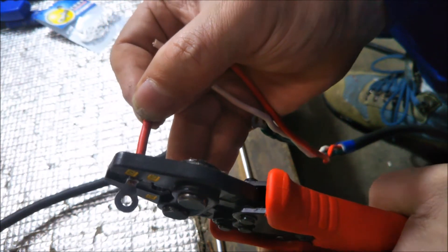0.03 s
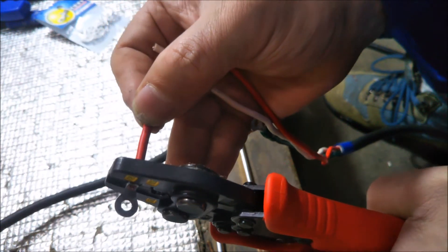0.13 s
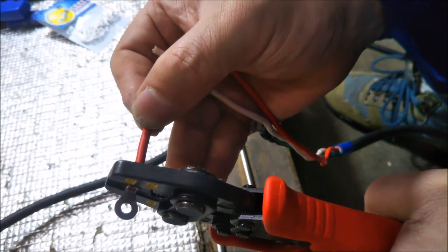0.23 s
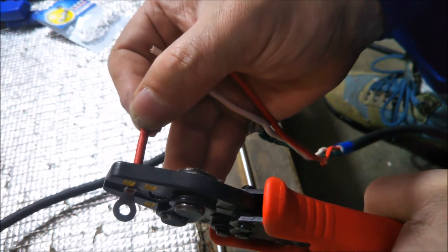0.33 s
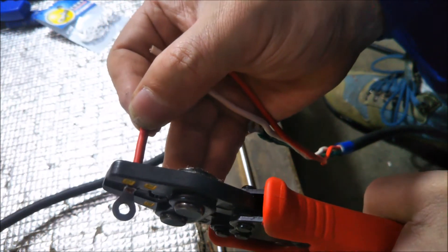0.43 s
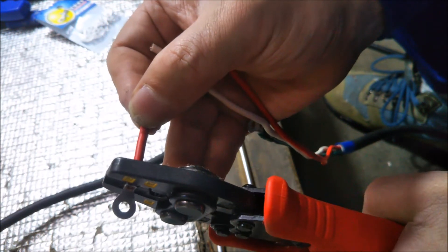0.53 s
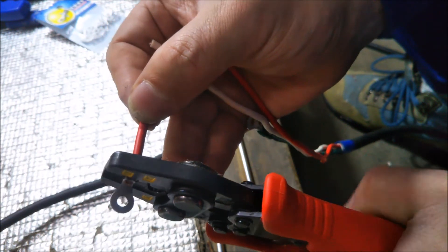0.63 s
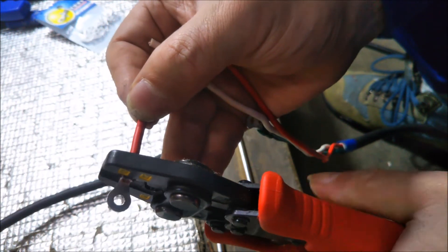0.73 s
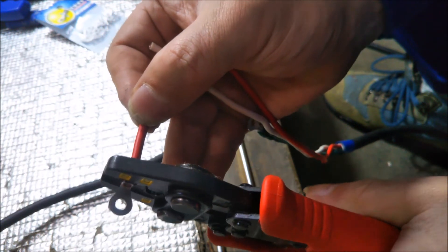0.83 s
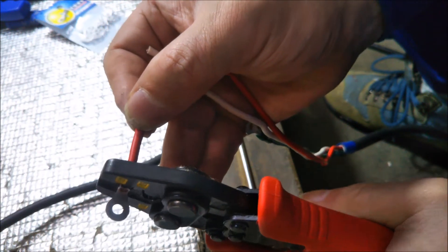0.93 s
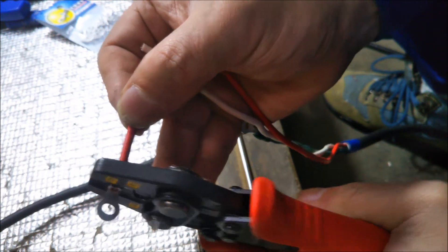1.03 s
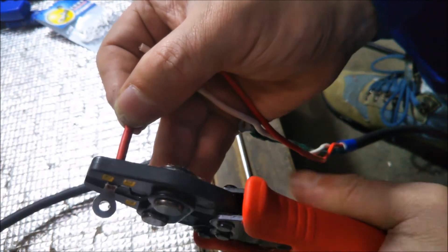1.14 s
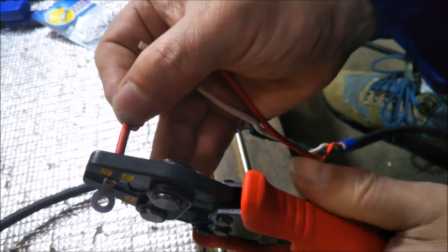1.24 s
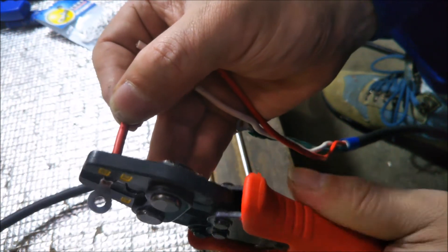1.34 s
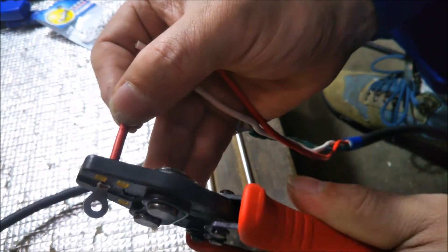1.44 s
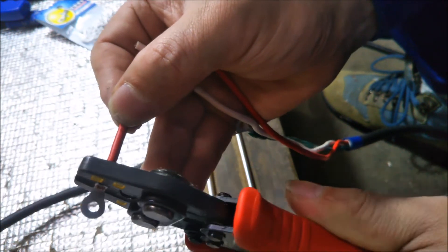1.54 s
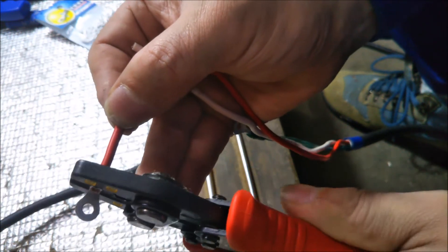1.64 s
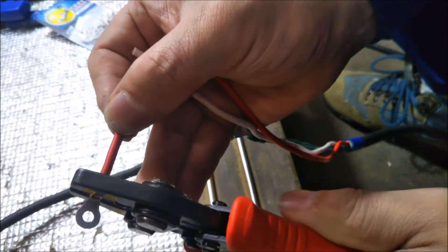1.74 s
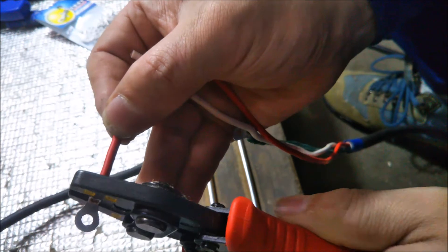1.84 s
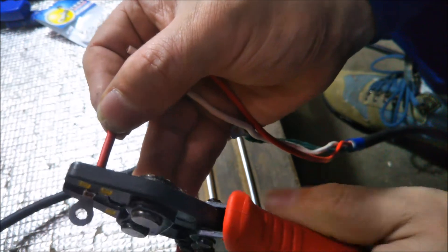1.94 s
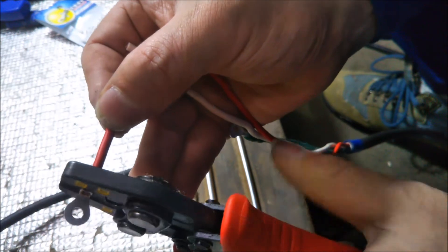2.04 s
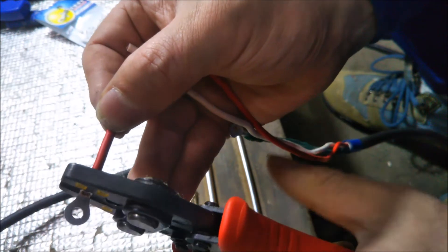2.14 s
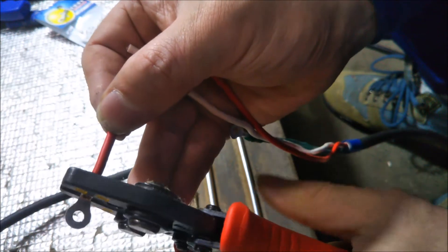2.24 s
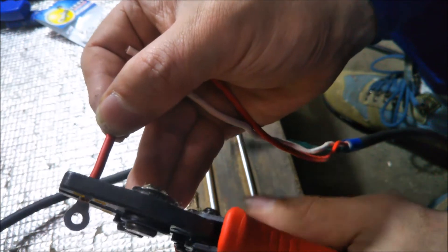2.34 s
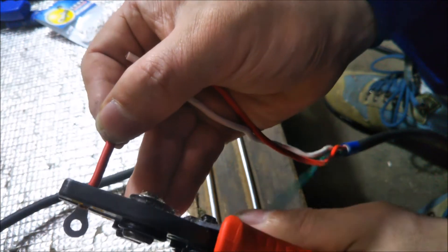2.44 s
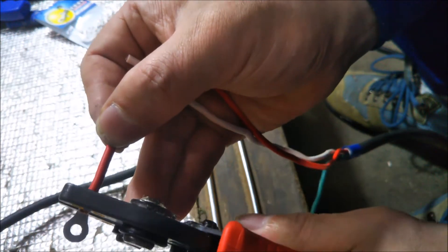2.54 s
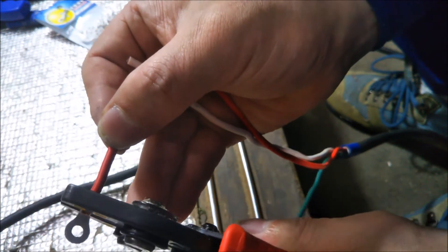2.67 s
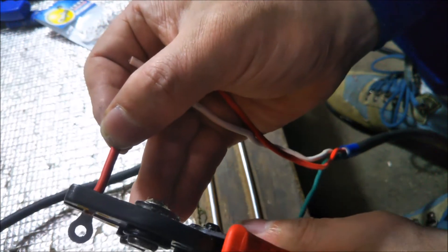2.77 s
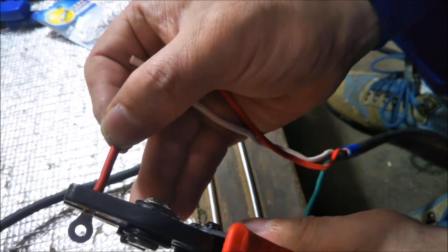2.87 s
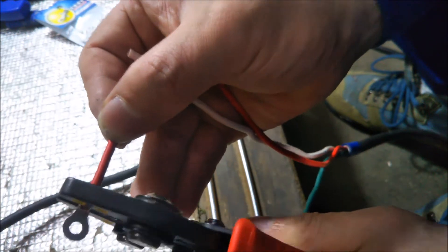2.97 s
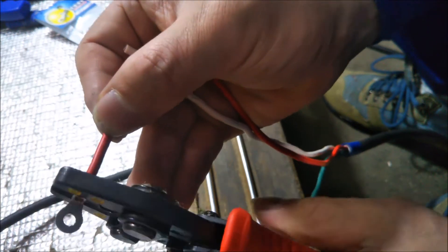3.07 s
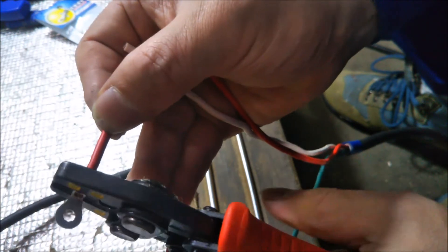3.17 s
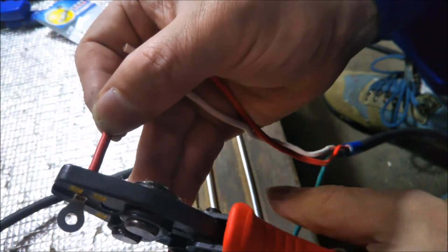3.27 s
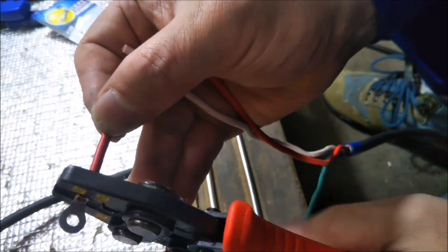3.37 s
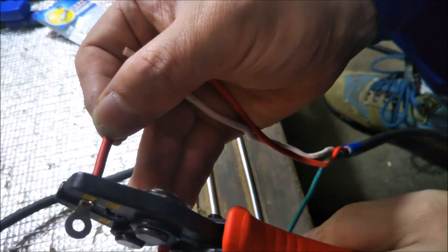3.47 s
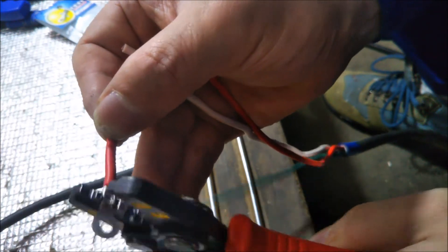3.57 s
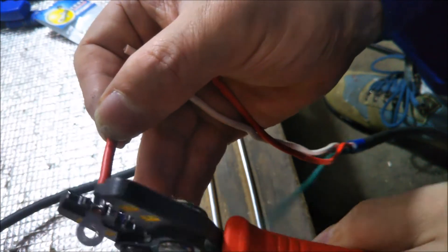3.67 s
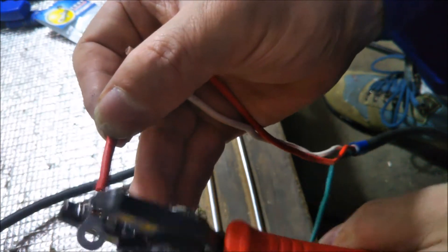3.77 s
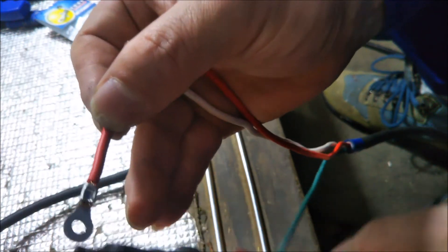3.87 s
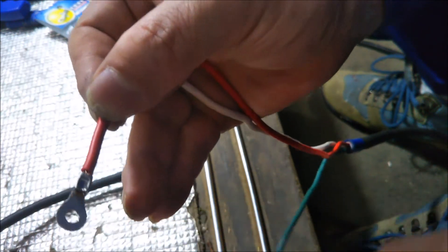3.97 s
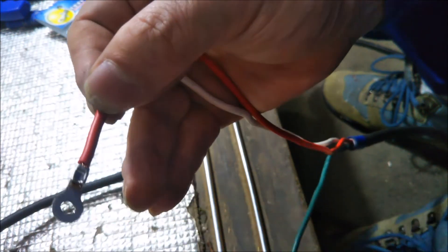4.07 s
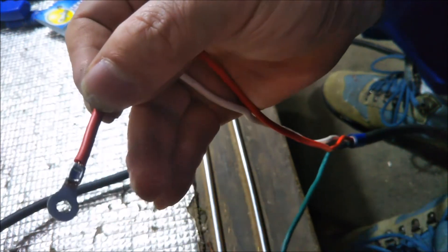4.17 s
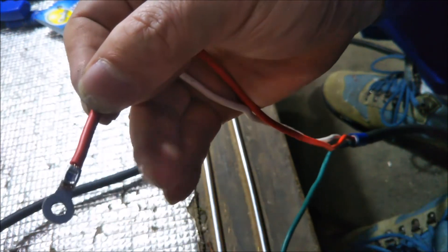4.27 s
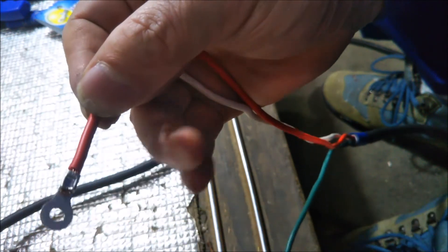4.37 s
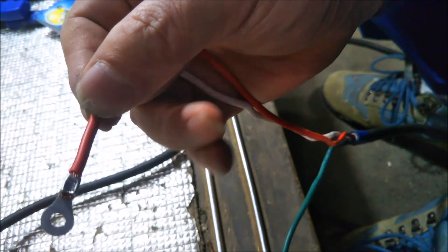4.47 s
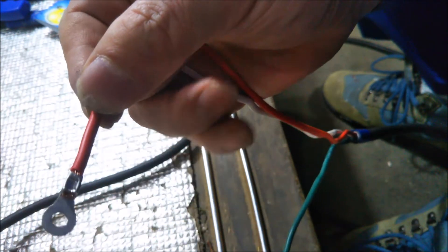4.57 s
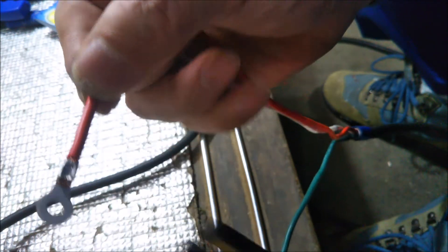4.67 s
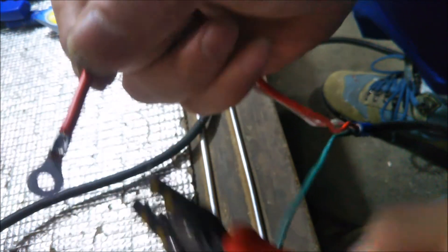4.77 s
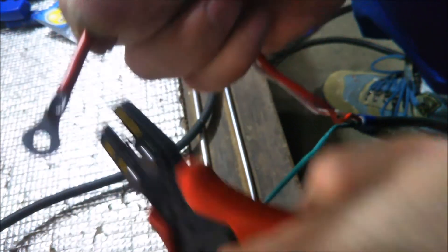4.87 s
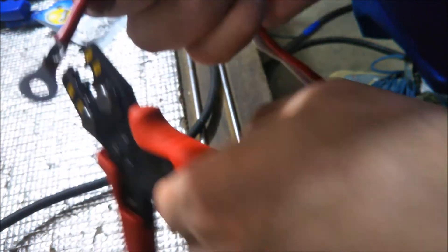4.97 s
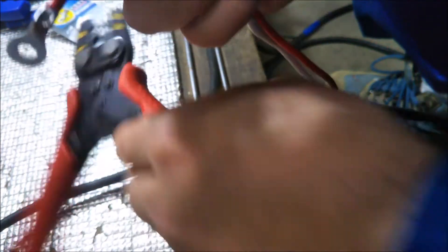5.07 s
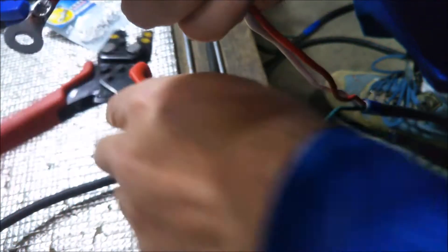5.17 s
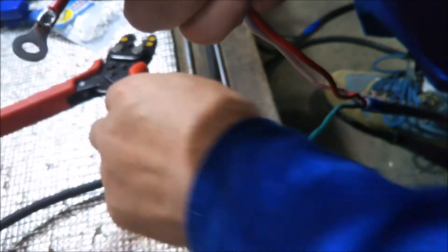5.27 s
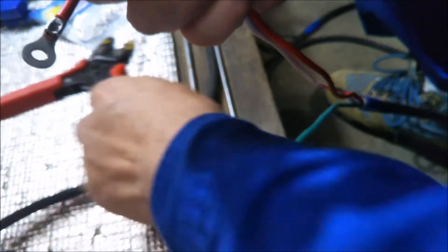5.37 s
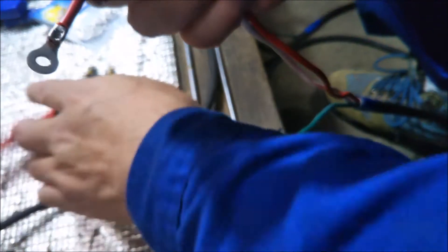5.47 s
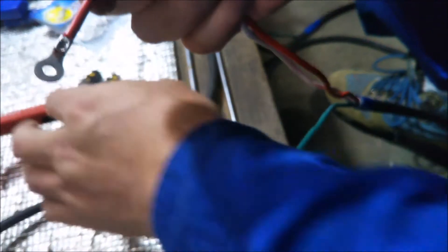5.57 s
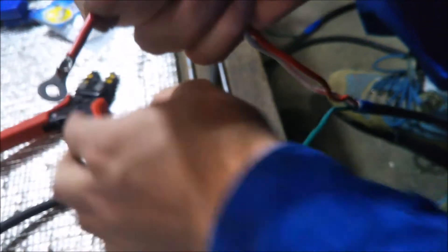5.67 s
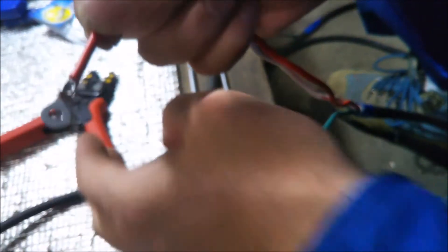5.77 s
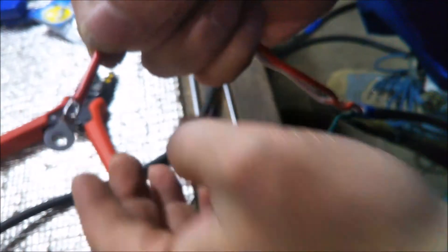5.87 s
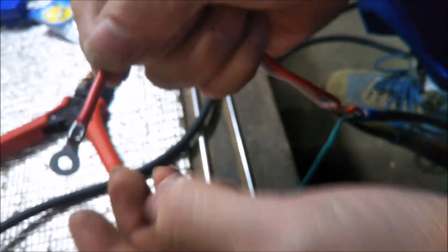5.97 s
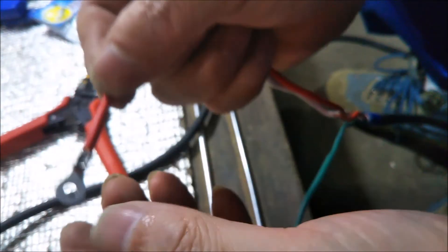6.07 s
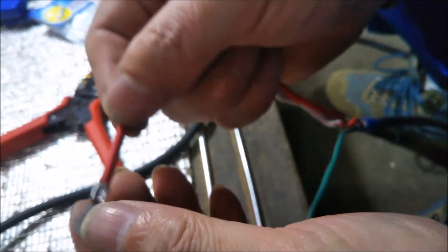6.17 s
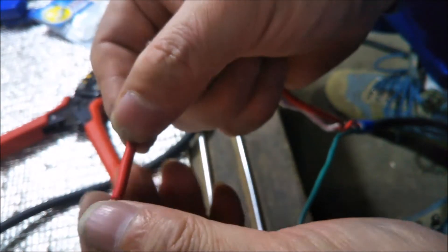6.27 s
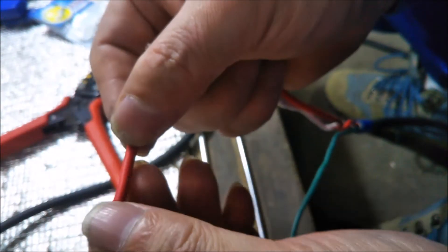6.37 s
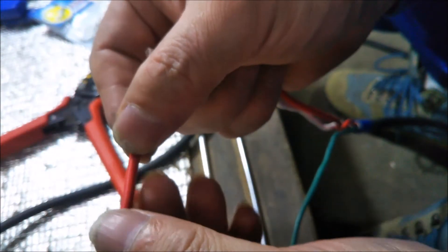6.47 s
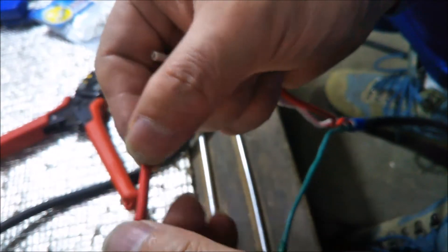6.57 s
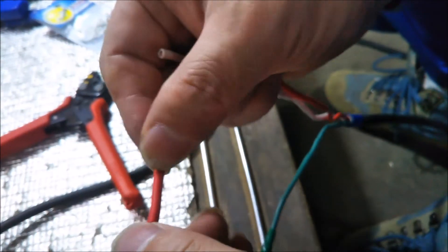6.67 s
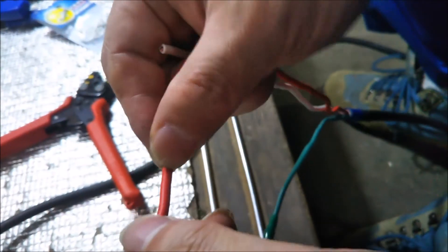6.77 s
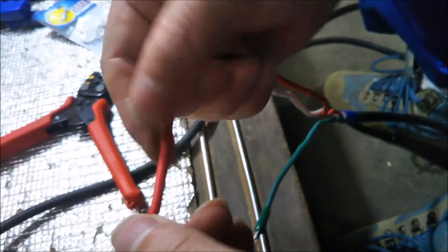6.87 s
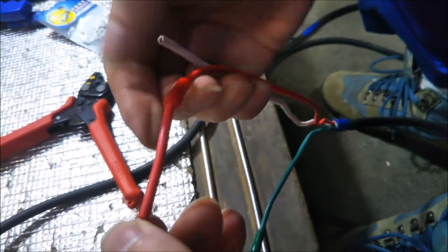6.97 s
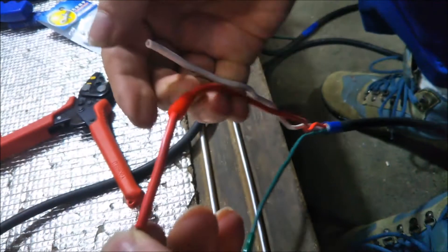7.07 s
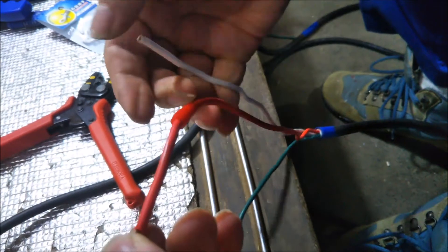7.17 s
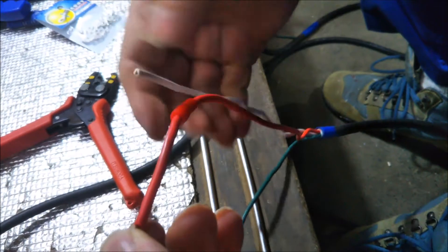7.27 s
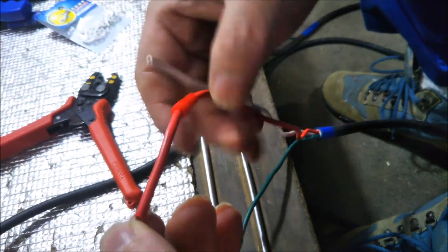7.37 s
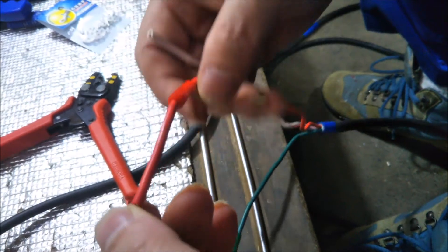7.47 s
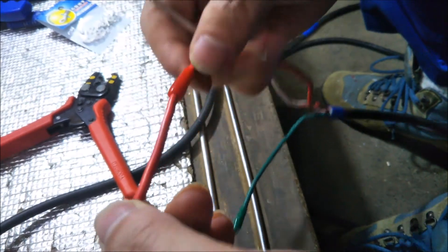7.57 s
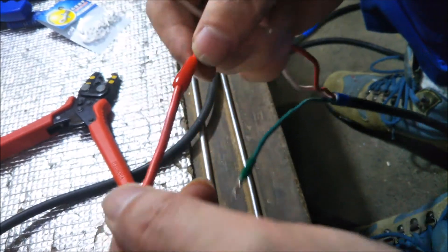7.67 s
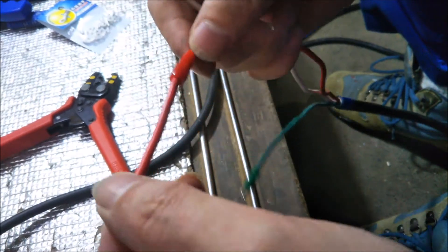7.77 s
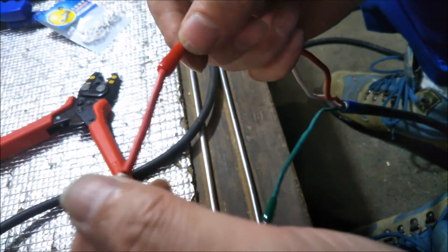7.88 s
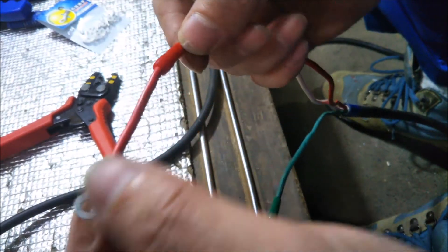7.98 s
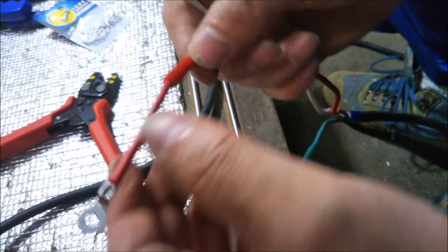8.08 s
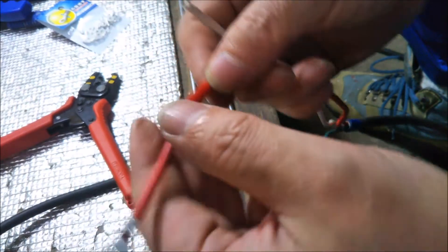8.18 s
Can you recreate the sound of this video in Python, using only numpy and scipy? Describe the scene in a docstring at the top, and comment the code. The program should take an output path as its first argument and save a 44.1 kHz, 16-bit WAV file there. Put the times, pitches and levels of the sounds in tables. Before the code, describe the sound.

A hand crimper ticks tooth by tooth, zips open, snaps hollowly twice, and is dropped with a knock and short slide amid quiet cloth rustles.

```python
"""A ratcheting crimper closes on a wire terminal: its steel pawl drops tooth by tooth, and the jaws ring faintly.
The pawl slips over a few teeth, then a spring runs it back over the rack, faster and faster, as the handles open.
The tool gives two dull snaps, is set down on a workbench with a clatter and a thump, and slides a little.
From shortly before the handles open to the end, a sleeve and fingers rustle faintly now and then.
Steady workshop air and a thin hiss, both made of coloured noise, lie under everything."""
import sys
import numpy as np
from scipy import signal
from scipy.fft import rfft, irfft, next_fast_len
from scipy.io import wavfile
from scipy.ndimage import uniform_filter1d, map_coordinates

SR = 44100
rng = np.random.default_rng(int(sys.argv[2]) if len(sys.argv) > 2 else 0)


def pcm_store(signal):
    """Save signal as 16-bit PCM."""
    levels = np.round(np.clip(np.atleast_2d(signal), -1, 1) * 32767)
    wavfile.write(sys.argv[1], SR, levels.astype(np.int16).T)


N = 362046  # length of the scene in samples

# In the tables, a fade time is the time a sound takes to drop by 60 dB.
# Bright colour of small hard contacts and of sliding. Each row: frequency in Hz, relative level in dB.
TICK_COLOUR = [(300, -8), (3000, -2), (4300, -3.5), (6000, -20.5), (8000, -4.5), (11000, -6), (14000, 1.5),
               (14600, -44), (16000, -30)]
TOOTH_TICK_FADE_S = 0.0062  # fade time of the tick of one tooth
SCATTER_DB = 1.5  # every mode is struck a little differently from blow to blow


def amp(db):
    """Turn decibels into a gain."""
    return 10 ** (np.asarray(db) / 20)


def unit(x):
    """Scale a sound to an rms (average strength) of 1."""
    return x / np.sqrt(np.mean(x ** 2) + 1e-20)


def along(points, hz):
    """Read values between (Hz, value) points on a logarithmic pitch axis."""
    f, v = np.transpose(points)
    return np.interp(np.log(hz + 1), np.log(f + 1), v)


def filtered(x, gain):
    """Multiply the spectrum of x by a gain that depends on frequency."""
    size = next_fast_len(N + SR // 2)
    spectrum = rfft(x, size) * gain(np.fft.rfftfreq(size, 1 / SR))
    return irfft(spectrum, size)[:N]


def noise(colour):
    """Shape random noise to a colour, at rms 1."""
    return unit(filtered(rng.standard_normal(N), lambda hz: amp(along(colour, hz))))


def add(track, s, sound):
    """Mix a sound into the track at s seconds; whatever falls outside the track is cut off."""
    start = round(s * SR)
    part = sound[max(-start, 0):N - start]
    track[max(start, 0):][:len(part)] += part


def burst(colour, t60, rise=0.00033, size=8192):
    """A contact: dying noise takes on the colour of the struck body, with the energy of 1 ms at rms 1."""
    t = np.arange(size) / SR
    fade = amp(-60 * t / t60)
    blow = rfft(rng.standard_normal(size) * fade * (1 - np.exp(-t / rise)))
    # divide out the blow's own smoothed colour, so that the struck body sets it
    ripple = np.sqrt(np.abs(uniform_filter1d(np.abs(blow) ** 2, size=130))) + 1e-9
    wanted = amp(along(colour, np.fft.rfftfreq(size, 1 / SR)))
    # folding the cepstrum gives a filter that only answers after the blow, never before
    cepstrum = irfft(np.log(wanted / ripple))
    body = np.exp(rfft(2 * cepstrum[:size // 2], size))
    hit = irfft(blow * body)
    return hit / np.linalg.norm(hit) * np.sqrt(SR / 1000)


def in_room(hit, wet_db, near_db, near_t60):
    """A hit with dense echoes from things nearby and the longer tail of the workshop."""
    # How long the workshop echoes. Each row: frequency in Hz, fade time in seconds.
    room_fade = [(100, 0.37), (500, 0.2), (1500, 0.3), (4000, 0.34), (8000, 0.27), (14100, 0.2),
                 (14600, 0.062)]
    hz, t, z = signal.stft(rng.standard_normal(SR // 2), SR, nperseg=256)
    fade = amp(-60 * t / along(room_fade, hz)[:, None])
    tail = signal.istft(z * fade, SR, nperseg=256)[1]
    t = np.arange(len(tail)) / SR
    tail = tail * (1 - np.exp(-t / 0.0014))
    near = rng.standard_normal(len(t)) * amp(-60 * t / near_t60) * (1 - np.exp(-t / .001))
    echoes = amp(wet_db) * tail / np.linalg.norm(tail) + amp(near_db) * near / np.linalg.norm(near)
    return signal.fftconvolve(hit, echoes + (t == 0))  # t == 0 passes the hit itself


def ring(modes, scatter_db):
    """One second of fading sine waves, the modes of a body, at new strengths for each blow."""
    t = np.arange(SR) / SR
    out = np.zeros(SR)
    for hz, db, t60 in modes:
        strength_db = db + scatter_db * rng.standard_normal()
        out += amp(strength_db - 60 * t / t60) * np.sin(2 * np.pi * hz * t)
    return out * (1 - np.exp(-t / .0003))  # a short swell at the start


def tinted(colour, pitch_hz):
    """A tick's colour, lifted around the pitch that the place of contact favours."""
    bump_db, bump_octaves = 5, 0.31  # height and width of the lift
    lifted = []
    for hz, db in colour:
        octaves_off = np.log2(hz / pitch_hz)
        lifted.append((hz, db + bump_db * np.exp(-(octaves_off / bump_octaves) ** 2)))
    return lifted


def workshop_air():
    """The steady air of the workshop: mostly low, soft noise."""
    # Colour of the air. Each row: frequency in Hz, relative level in dB.
    air_colour = [(15, -54), (25, -14), (40, 0), (60, 3), (145, -6.5), (189, -4.5), (285, -8), (325, -12.5),
                  (378, -9), (460, -10), (501, -8.5), (1120, -10.5), (1390, -9), (2910, -14), (4500, -21.5),
                  (5850, -45.5), (9900, -120)]
    return amp(-53.5) * noise(air_colour)


def microphone_hiss():
    """The thin, steady hiss of the microphone: mostly high noise."""
    # Colour of the hiss. Each row: frequency in Hz, relative level in dB.
    hiss_colour = [(2500, -19), (4500, 1.5), (5800, -10), (7200, -1.5), (10000, -1), (12500, 0), (14200, 6),
                   (14500, -37), (16000, -50)]
    return amp(-66.0) * noise(hiss_colour)


def rub(strokes, rise, colour, rough_db, catch_rate):
    """Strokes of friction noise that swell and fade; the strength wavers as the surfaces catch and slip."""
    t = np.arange(N) / SR
    level = np.zeros(N)
    for s, db, t60 in strokes:
        swell = np.interp(t, [s - rise, s], [0, 1])
        level += swell * amp(db - 60 * np.maximum(t - s, 0) / t60)
    # smooth random ups and downs, catch_rate random points per second
    catches = map_coordinates(rng.standard_normal(N // 20), [t * catch_rate], mode="wrap")
    return level * unit(noise(colour) * amp(rough_db * catches))


def fingers():
    """Fingers run along the wire: bright, fairly even friction noise."""
    # Strokes of the fingers. Each row: peak time in seconds, level in dB, fade time in seconds.
    finger_strokes = [(2.985, -60, 0.56), (6.06, -59.5, 0.3), (6.83, -60, 0.24), (7.91, -59.5, 0.62)]
    # Colour of skin on wire. Each row: frequency in Hz, relative level in dB.
    skin_colour = [(1500, -33), (3500, 3), (5800, -14), (7500, -3), (9500, -6), (14000, -21), (14600, -35)]
    return rub(finger_strokes, .035, skin_colour, rough_db=1.5, catch_rate=150)


def sleeve():
    """A sleeve moves: darker friction noise of cloth."""
    # Moves of the sleeve. Each row: peak time in seconds, level in dB, fade time in seconds.
    sleeve_moves = [(3.17, -57.5, .4), (4.345, -51, 2.4), (4.9, -58, 2.3), (5.84, -59, 0.42),
                    (7.24, -55, 0.17)]
    # Colour of cloth. Each row: frequency in Hz, relative level in dB.
    cloth_colour = [(60, -4), (200, 4), (400, -0.5), (700, -5.5), (1100, 3.5), (1600, -11), (3500, -12.5),
                    (6000, -33), (14000, -25), (14700, -60)]
    return rub(sleeve_moves, 0.05, cloth_colour, rough_db=3, catch_rate=60)


def slide():
    """The tool slides on the bench: bright, rough friction noise."""
    # Strokes of the tool. Each row: peak time in seconds, level in dB, fade time in seconds.
    slide_strokes = [(5.546, -46, 0.25), (5.675, -46.5, 0.45)]
    return rub(slide_strokes, 0.017, TICK_COLOUR, rough_db=4, catch_rate=400)


def chatter(t60, count):
    """(delay in s, dB) of the quick, uneven and ever weaker contacts of one landing."""
    gap_s, gap_scatter = .0058, 0.11  # typical time between contacts, its relative spread
    gaps = gap_s * np.exp(gap_scatter * rng.standard_normal(count))
    delays = np.cumsum(gaps) - gaps[0]
    return zip(delays, -60 * delays / t60)


def clatter():
    """Steel lands on the bench and chatters: each contact is a bright tick plus a hard knock."""
    # Each row: start in seconds, bright tick in dB, hard knock in dB, fade time of the chatter in seconds.
    landings = [(5.5278, -43, -23.5, .008), (5.5338, -24, -23.5, 0.31), (5.590, -37, -40, 0.16),
                (5.644, -36, -44, 0.091), (5.685, -40, -39.5, 0.28), (5.7355, -43, -45, .008),
                (5.7510, -41, -30.5, .006)]
    # Colour of the knock. Each row: frequency in Hz, relative level in dB.
    knock_colour = [(100, -15), (700, -3), (1100, -5.5), (1700, -2.5), (2700, -1.5), (3700, -6),
                    (4400, -19), (5500, -29.5), (15000, -35)]
    contact_t60 = 0.012  # fade time of one contact in seconds
    out = np.zeros(N)
    for s, tick_db, knock_db, chatter_t60 in landings:
        for delay, db in chatter(chatter_t60, count=5):
            tick = amp(tick_db) * burst(TICK_COLOUR, contact_t60)
            knock = amp(knock_db) * burst(knock_colour, contact_t60)
            add(out, s + delay, amp(db) * in_room(tick + knock, wet_db=-13, near_db=-5, near_t60=0.055))
    return out


def bench_thumps():
    """The tool's weight lands and the bench top booms in its low modes."""
    # Each row: start in seconds, level in dB, contact time in seconds.
    thumps = [(5.5393, -9.5, 0.0034), (5.5537, -7.5, 0.0046), (5.596, -23.5, 0.0032),
              (5.696, -23.5, 0.0067), (5.822, -39.5, 0.0061)]
    # Modes of the bench top. Each row: frequency in Hz, relative level in dB, fade time in seconds.
    bench_modes = [(62.6, -26, 0.071), (79.1, -14.5, 0.26), (130.2, -18, 0.25), (148, -2, 0.085),
                   (179.2, -16, 0.38), (243, -16, 0.085)]
    out = np.zeros(N)
    t = np.arange(SR // 20) / SR
    for s, db, contact in thumps:
        push = np.sin(np.pi * np.minimum(t / contact, 1))  # soft grips spread the blow in time
        boom = signal.fftconvolve(ring(bench_modes, SCATTER_DB), push / push.sum())
        add(out, s, -amp(db) * boom)  # minus: the top gives way downward
    return out


def snaps():
    """Heavy, damped blows that rebound at once, with two short hollow notes and much echo."""
    # Dull snaps of the tool. Each row: start in seconds, level in dB, bright tick in dB,
    # fade time of the blow in seconds, hollow note in Hz, level of that note in dB.
    blows = [(4.679, -25, -33, 0.017, 1570, -46), (4.6835, -19.5, -31.5, 0.021, 1546, -22),
             (4.8244, -6.5, -25.5, 0.007, 1213, -16.5)]
    # Colour of a blow. Each row: frequency in Hz, relative level in dB.
    snap_colour = [(40, -22), (160, 3), (350, -6.5), (560, -3), (750, -0.5), (1200, -4), (1500, -2.5),
                   (2000, -7.5), (2600, -10), (3200, -13.5), (3560, -8.5), (3850, -16), (4700, -23.5),
                   (5800, -36), (15000, -53)]
    rebound_s, rebound_db = 0.0038, -10.5  # the joint rebounds just after each blow
    high_note_hz, high_note_db = 3560, -25  # a higher note in every snap, relative to the blow
    note_t60 = .05  # fade time of both notes in seconds
    out = np.zeros(N)
    for s, db, tick_db, t60, note_hz, note_db in blows:
        for delay, share_db in [(0, 0), (rebound_s, rebound_db)]:
            blow = amp(db) * burst(snap_colour, t60) + amp(tick_db) * burst(TICK_COLOUR, t60)
            add(out, s + delay, amp(share_db) * in_room(blow, wet_db=-13, near_db=-6, near_t60=0.115))
        notes = [(note_hz, note_db, note_t60), (high_note_hz, db + high_note_db, note_t60)]
        add(out, s, ring(notes, SCATTER_DB))
    return out


def free_run(count):
    """(s, dB) of the teeth that pass the pawl as the spring speeds the rack up evenly."""
    release_s = 3.5131
    start_speed, acceleration = 41.6, 4064  # teeth per second, teeth per second squared
    first_db, fade_db_per_s = -11, 12  # level of the first free tooth, loss with time
    speed = np.sqrt(start_speed ** 2 + 2 * acceleration * np.arange(count))
    t = (speed - start_speed) / acceleration
    return list(zip(release_s + t, first_db - fade_db_per_s * t))


def opening():
    """The spring pulls the pawl back over the teeth, faster and faster; a short, faint ring follows."""
    # The pawl slips over single teeth while the hand still holds. Each row: start in seconds, level in dB.
    slips = [(3.4346, -14), (3.445, -10.5), (3.4561, -13.5), (3.4934, -11)]
    # Colour of a tick on the way back. Each row: frequency in Hz, relative level in dB.
    rack_colour = [(100, -15), (1300, -22.5), (2100, -15.5), (3200, -13), (4600, -7.5), (5300, -13),
                   (6100, -20.5), (7000, -5), (9500, -9.5), (11800, -1.5), (14000, 2.5), (14700, -27),
                   (16000, -49)]
    # Short modes of the pawl. Each row: frequency in Hz, relative level in dB, fade time in seconds.
    pawl_modes = [(1730, -21, 0.034), (3800, -7, 0.013), (4630, -9, 0.025), (7100, 2, 0.008),
                  (8000, 1, 0.009), (9330, -2, .008), (10600, -6, .008), (11750, -5, .012)]
    # Rings of the return spring. Each row: frequency in Hz, relative level in dB, fade time in seconds.
    spring_modes = [(1754, -4, .1), (3865, -7, .35), (4350, -5, .3), (4753, -10, .45), (5303, -15, .6),
                    (7294, -11, .35), (8473, -8, .18)]
    # A short, faint ring of fixed pitches follows the last tick.
    # Each row: frequency in Hz, level in dB, fade time in seconds.
    faint_ring = [(1754, -37, .1), (4637, -29, .07), (13300, -32, .06)]
    clack_db, spring_db = -10, -38.5  # rings of the pawl and of the spring, relative to the tick
    out = np.zeros(N)
    teeth = list(slips) + free_run(count=10)
    for s, db in teeth:
        favoured_hz = rng.uniform(2490, 11950)  # each tooth favours some pitch in this range
        tick = burst(tinted(rack_colour, favoured_hz), TOOTH_TICK_FADE_S)
        clack = amp(clack_db) * ring(pawl_modes, SCATTER_DB)[:len(tick)]
        add(out, s, amp(db) * in_room(tick + clack, wet_db=-11.5, near_db=-17, near_t60=.016))
        add(out, s, amp(db + spring_db) * ring(spring_modes, SCATTER_DB))
    add(out, teeth[-1][0], ring(faint_ring, SCATTER_DB))
    return out


def closing():
    """Each tooth gives a hard tick and a second, weaker one, and the jaws ring on faintly."""
    # The pawl drops under load. Each row: start in seconds, level in dB, ring of the jaws in dB
    # relative to the tick, most strongly rung pitch in Hz, pitch that colours the tick in Hz,
    # second drop in dB relative to the first.
    tooth_drops = [(-.012, -14.5, -42, 7660, 4050, -32), (0.2954, -14.5, -43.5, 7660, 4370, -22),
                   (0.8853, -15, -43, 3150, 2680, -32), (2.376, -23, -51, 8300, 7900, -1)]
    # Long rings of the steel jaws. Each row: frequency in Hz, relative level in dB, fade time in seconds.
    jaw_modes = [(3149, -1, .95), (3741, -4, .35), (5550, -13, .25), (6810, -2, .35), (7662, 3, .3),
                 (8193, -10, .5), (8303, -4, .7), (8489, -9, .55), (13590, -4, .2)]
    # Colour of a tick under load. Each row: frequency in Hz, relative level in dB.
    tooth_colour = [(100, -40), (1500, -26), (2600, -23.5), (3500, -13), (4400, -15.5), (4950, -26),
                    (5400, -17.5), (6000, -27), (6700, -10.5), (7400, -22), (8500, -10.5), (11500, -9),
                    (13000, 1), (13900, 1.5), (14500, -23), (15000, -64)]
    stutter_s = 0.0021  # a tooth that catches drops a second time
    out = np.zeros(N)
    for s, db, ring_db, rung_hz, tick_hz, stutter_db in tooth_drops:
        for delay, drop_db in [(0, db), (stutter_s, db + stutter_db)]:
            tick = burst(tinted(tooth_colour, tick_hz), TOOTH_TICK_FADE_S)
            add(out, s + delay, amp(drop_db) * in_room(tick, wet_db=-13.5, near_db=-13, near_t60=.016))
        # where the tooth strikes decides which modes of the jaws answer most
        modes = [(hz, level + 7 * (abs(hz - rung_hz) < 400), t60) for hz, level, t60 in jaw_modes]
        add(out, s, amp(db + ring_db) * ring(modes, SCATTER_DB))
    return out


def scene():
    """All sources added together at one close microphone."""
    background = workshop_air() + microphone_hiss()
    handling = fingers() + sleeve() + slide()
    set_down = clatter() + bench_thumps()
    return (background + handling + set_down + snaps() + opening() + closing())[None]


def record(dry):
    """The microphone loses the deep bass, sharp peaks are rounded, and the highest treble is cut off."""
    top_hz = 15700  # nothing is kept from here up
    bass_cut = signal.butter(2, 50, "high", fs=SR, output="sos")
    thin = signal.sosfilt(bass_cut, dry[0])
    rounded = thin / (1 + np.abs(thin / .62) ** 6) ** (1 / 6)  # no peak can pass 0.62 here
    return filtered(rounded, lambda hz: hz < top_hz)[None]


dry = scene()
out = record(dry)
pcm_store(out)
```